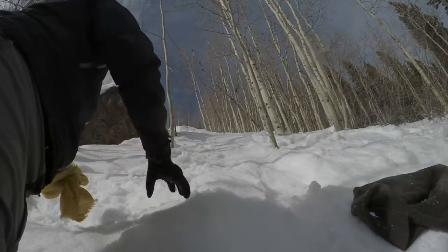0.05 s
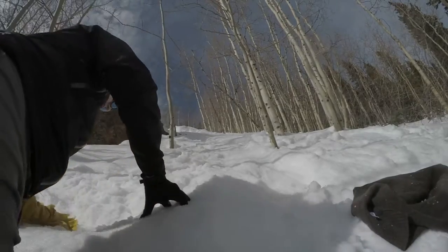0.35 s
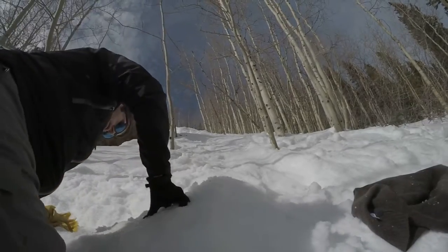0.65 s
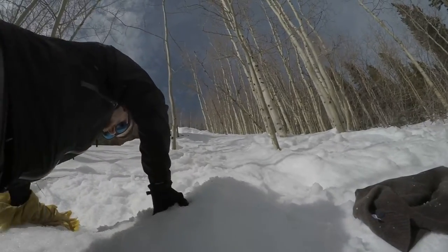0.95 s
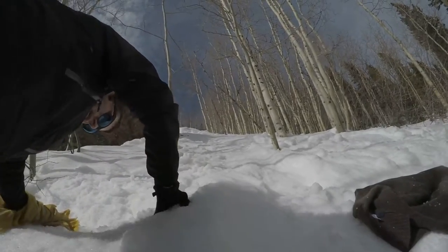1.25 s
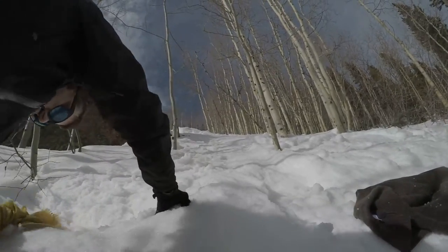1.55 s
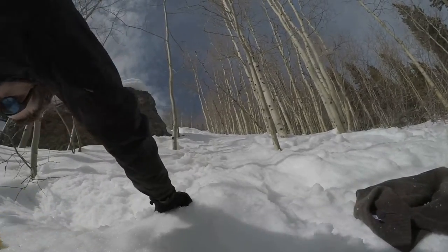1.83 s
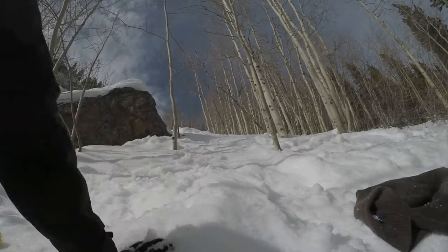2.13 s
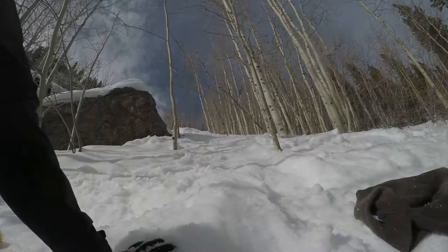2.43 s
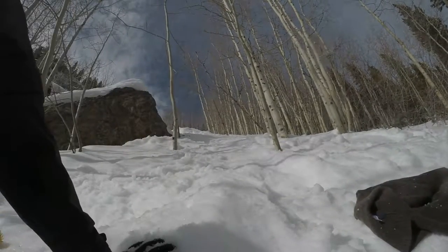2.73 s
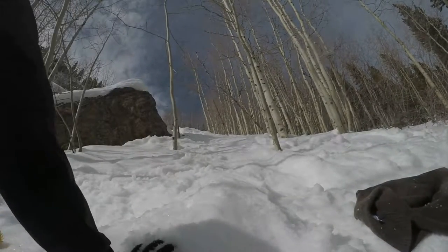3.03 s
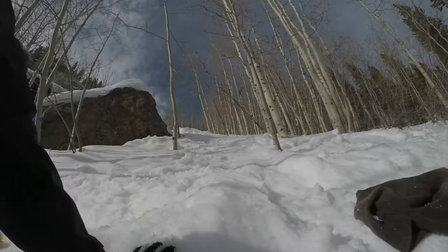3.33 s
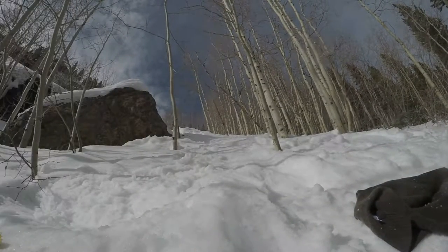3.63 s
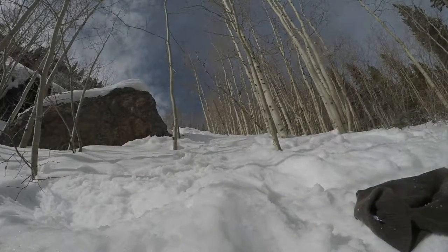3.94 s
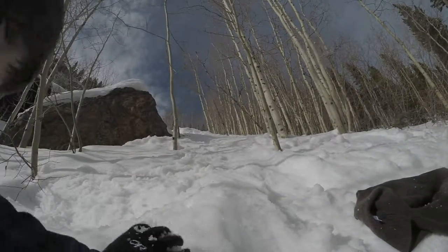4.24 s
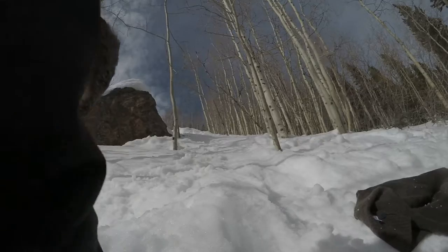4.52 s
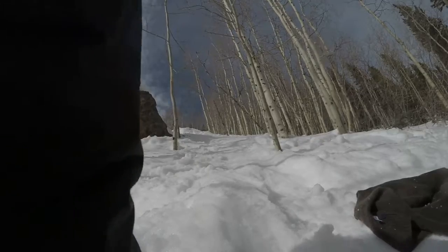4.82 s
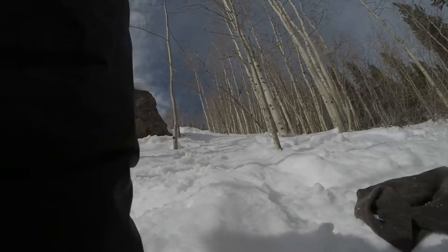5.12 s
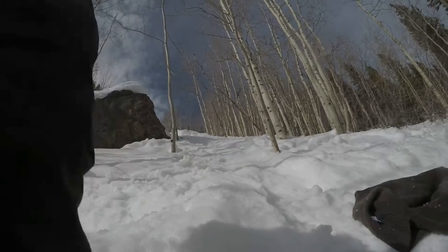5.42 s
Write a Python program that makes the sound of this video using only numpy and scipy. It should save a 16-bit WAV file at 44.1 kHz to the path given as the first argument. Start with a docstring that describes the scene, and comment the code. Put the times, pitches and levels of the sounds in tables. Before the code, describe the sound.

Outdoors in quiet air, a microphone resting in the snow picks up a person shifting about very close by. First come muffled crunches, low creaks and gritty glove scrapes as a hand presses into the crust. Soft nylon swishes and scattered ticks follow, with a few more knocks. Last and loudest, one heavy footstep thuds and crunches beside the microphone, sounding slightly boxy.

```python
"""Packed snow knocks, crunches and groans as someone leans on a gloved hand and shifts about.
Its slips ring the case of a camera set in the snow right beside them, and so reach its two microphones.
The crust snaps, the glove scuffs over it, and the sleeves of a nylon jacket swish and zip, over a faint
outdoor hush. At the end a heavy step crunches down next to the camera."""
import sys
import numpy as np
from scipy import signal
from scipy.fft import rfft, irfft
from scipy.io import wavfile
from scipy.ndimage import uniform_filter1d

SR = 44100
rng = np.random.default_rng(int(sys.argv[2]) if len(sys.argv) > 2 else 0)


def to_wav(sig):
    """Store sig (one row per channel, or 1-D mono) as 16-bit WAV at the path in sys.argv[1].

    Samples outside -1..1 are clipped; the rate is SR.
    """
    pcm = np.clip(np.atleast_2d(sig), -1, 1) * 32767
    pcm = np.round(pcm).astype(np.int16)
    wavfile.write(sys.argv[1], SR, pcm.T)  # frames by channels


N = 250047
TIME = np.arange(N) / SR
SIDES = np.array([[1], [-1]])   # left, right


# single slips, relative levels: (time [s], thud [dB], clack [dB], ring [dB], thud tilt [dB/octave])
SNOW_SLIPS = [(0.575, -25, -43, -49, 3), (0.739, -17, -44, -51, 18), (0.792, -19.5, -29, -27.5, 4),
              (0.808, -27, -31, -49, 10), (0.861, -17.5, -29, -35.5, 5), (1.061, -21, -40, -52, 3),
              (1.148, -26, -39, -61, -3), (1.492, -14, -27.5, -31.5, 0), (1.575, -24.5, -47, -56, -2),
              (1.681, -30, -47, -50, 11), (1.801, -24, -48, -59, -5), (2.091, -20, -34.5, -43, -5),
              (2.656, -23, -39.5, -49, 2), (3.198, -24.5, -41.5, -56, -4), (3.732, -25, -41, -57.5, 1),
              (4.174, -32, -60, -69.5, -1.5), (4.429, -26.5, -58, -53, 0), (4.642, -15.5, -30, -37.5, -0.5),
              (4.763, -19, -37, -42, 2.5), (5.229, -32, -42.5, -62, -1), (5.345, -26, -52, -48.5, -0.5),
              (5.493, -1.5, -42, -42, 5), (5.534, -9, -33, -31, 1), (5.545, -13.5, -34.5, -32, 5),
              (5.557, -15, -41, -41, 2), (5.622, -6.5, -26.5, -52, 11), (5.645, -22, -31, -55, 5)]

def knocks(thud_db=14, clack_db=16, ring_db=10, soft_hz=300, highpass_hz=148):
    """Snow gives way in single slips that push on the case; the harder ones reach its higher modes."""
    s, thud, clack, ring, tilt = np.transpose(SNOW_SLIPS)
    at = np.clip((s * SR).astype(int), 0, N - 1)

    def force_at(hz):
        if hz < 400:
            blow_db = thud + thud_db + tilt * np.log2(hz / 200)
        else:
            blow_db = clack + clack_db if hz < 900 else ring + ring_db
        push = np.zeros(N)
        push[at] = from_db(blow_db + rng.normal(0, 0.84, len(at)))
        return cut(push, soft_hz, "low") if hz < 400 else push   # the snow bed yields slowly
    return cut(case(force_at, damping=1.72, top_hz=1680), highpass_hz, "high", order=4)


# runs of quick slips: (start [s], relative level [dB], length [s], slip gap [s], lower-mode gain [dB])
SLIP_RUNS = [(0.5615, -30, 0.008, 0.003, 5.5), (0.585, -37, 0.006, 0.0038, 6),
             (0.73, -38.5, 0.02, 0.0032, 7), (0.814, -35, 0.008, 0.0031, 2), (0.83, -37, 0.017, 0.0086, 6),
             (4.807, -37, 0.007, 0.004, -9), (5.5083, -16, 0.003, 0.0025, -2),
             (5.515, -10.5, 0.0135, 0.0055, -2), (5.5294, -18, 0.008, 0.0053, 3),
             (5.546, -16, 0.008, 0.005, -4), (5.559, -17.5, 0.005, 0.0035, 0),
             (5.587, -14, 0.004, 0.0072, 3), (5.598, -18, 0.008, 0.007, 3.5),
             (5.612, -21.5, 0.019, 0.0042, 2), (5.638, -37, 0.011, 0.004, 3)]

def crunches(level_db=1, first_db=1, jitter=0.0996, scatter_db=2.5, highpass_hz=450):
    """Snow fails in a run of nearly even slips; each hits the case at another spot, changing colour."""
    max_slips = 12
    slips = []
    for s, db, length, gap_s, body_db in SLIP_RUNS:
        delays_s = np.cumsum(gap_s * np.exp(jitter * rng.standard_normal(max_slips)))
        slips.append((s, db + first_db, body_db))
        slips += [(s + delay, db, body_db) for delay in delays_s if delay < length]
    s, db, body_db = np.transpose(slips)
    at = np.minimum((s * SR).astype(int), N - 1)

    def force_at(hz):
        push = np.zeros(N)
        scatter = rng.standard_normal(max_slips * (len(SLIP_RUNS) + 1))[:len(at)]
        push[at] = from_db(db + body_db * (hz < 1200) + scatter_db * scatter)
        return cut(push, highpass_hz, "high")
    return from_db(level_db) * case(force_at, damping=1.6)


# weight packing the snow: (start [s], length [s], relative level [dB], slip rate [1/s])
SNOW_PRESSES = [(0.118, 0.034, -37, 221), (0.191, 0.034, -37.5, 228), (0.267, 0.027, -35, 260),
                (0.335, 0.16, -38, 244), (0.548, 0.05, -29.5, 247), (0.621, 0.029, -35, 249),
                (0.694, 0.022, -32.5, 253), (0.732, 0.012, -23.5, 264), (0.799, 0.055, -32, 234),
                (0.901, 0.29, -40.5, 229), (1.232, 0.0606, -29.5, 175.5), (1.341, 0.047, -37.5, 182),
                (1.517, 0.13, -32, 229), (1.669, 0.049, -28, 274), (1.741, 0.0559, -32, 250),
                (1.803, 0.0922, -42.5, 185), (1.936, 0.013, -38.5, 177), (2.813, 0.026, -36, 159),
                (2.85, 0.129, -42.5, 160), (4.434, 0.1, -44, 200), (4.589, 0.062, -39.5, 181),
                (4.836, 0.13, -42.5, 235), (5.21, 0.099, -37.5, 182), (5.336, 0.023, -30, 200),
                (5.387, 0.077, -45, 244), (5.48, 0.016, -27, 180), (5.514, 0.03, -20, 257),
                (5.575, 0.028, -26.5, 190), (5.612, 0.023, -18.5, 250)]

def groan(level_db=1, rest_db=-54, rest_per_s=205, muffle_hz=320, lumps_db=1.5, rumble_db=-21):
    """Loaded snow creaks in nearly periodic slips, muffled to the low modes; it settles between presses."""
    loads = [(from_db(db) * held(s, length, attack_s=0.01506, release_s=0.03), per_s)
             for s, length, db, per_s in SNOW_PRESSES]
    weight = power_sum((load for load, _ in loads), rest_db)
    per_s = blended_rate(loads, weight, rest_per_s)
    slips = stick_slip(per_s * np.exp(0.14 * drift(24.78)))
    slips = cut(slips, muffle_hz, "low", order=5)
    slips = cut(slips, 121, "high")
    creak = evened(case(lambda hz: slips, damping=0.91), window_s=0.0248)
    # the camera rocks in its bed, more under heavy load
    rumble = unit_rms(cut(rng.standard_normal(N), [20, 70], "band"))
    rumble = rumble * from_db(rumble_db) * (weight / weight.mean()) ** 0.66
    return weight * from_db(level_db + lumps_db * drift(25)) * (creak + rumble)


def stick_slip(per_s, jitter=0.2, spread=0.38):
    """Stress builds and lets go at uneven intervals: clicks of one sign and varying size."""
    gaps, sizes = rng.standard_normal((2, 8000))
    at = np.searchsorted(np.cumsum(per_s) / SR, np.cumsum(np.exp(jitter * gaps)))
    slips = np.zeros(N)
    slips[at[at < N]] = np.exp(spread * sizes[at < N])
    return slips


# modes of the case in snow: (frequency [Hz], t60 at damping 1 [s], gain [dB], L-R phase [rad], L-R [dB])
CASE_MODES = [(155.5, 0.039, -3.5, 0.44, -6), (194.4, 0.084, -14, 0.12, -0.5), (241, 0.042, -9, 1.24, 1.5),
              (300, 0.017, -15, 3.05, 10), (520, 0.11, -13.5, 1.1, 10), (575.5, 0.041, -2.5, 3.61, 8.5),
              (710, 0.051, -8.5, 2.84, 0.5), (815, 0.021, -17.5, 2.47, -4), (954.7, 0.1, -15.5, 2, -6),
              (1310, 0.05, -18, 1.5, -7), (1448, 0.056, -10.5, 7.4, -1), (1616, 0.061, -3.5, 2.6, 1),
              (1745, 0.038, -8, 0.66, -7), (1836, 0.071, -19, 1.1, -7), (1984, 0.1, -18.5, 0.36, 7),
              (2092, 0.078, -21.5, 0.91, -9)]

def case(force_at, damping, top_hz=2400, band_ratio=1.25, give=0.026, give_hz=5):
    """The case rings, each mode driven by force_at(hz); the snow bed gives, detuning the lower modes."""
    bend = 2 * np.pi * np.cumsum(give * drift(give_hz)) / SR
    out = 0
    for hz, t60, db, phase, pan_db in CASE_MODES:
        pole = from_db(-60 * damping / (t60 * SR)) * np.exp(2j * np.pi * hz / SR)
        force = cut(force_at(hz), [hz / band_ratio, hz * band_ratio], "band", order=1)
        detune = np.exp(1j * hz * bend) if hz < 800 else 1
        swing = detune * signal.lfilter([1], [1, -pole], force / detune + 1e-18)
        out = out + np.imag(swing * np.exp(0.5j * SIDES * phase)) * from_db(db + SIDES * pan_db / 2)
    return cut(out, top_hz, "low", order=4)


# crystal spray: (frequency [Hz], relative density [dB])
SPRAY_SPECTRUM = [(200, 6), (600, 17.5), (2000, 12), (4000, 4.5), (6500, 2.5), (9000, -9), (15000, -48)]
# crust breaks: (time [s], relative level [dB], t60 [s], flake pitch [Hz], edge gain [dB])
CRUST_SNAPS = [(0.0204, -31.5, 0.0069, 2700, 23.5), (0.0515, -41.5, 0.0094, 1400, 18),
               (0.47, -40.5, 0.015, 1300, 20), (0.959, -35.5, 0.067, 1600, 11),
               (1.043, -40, 0.027, 1900, 19), (1.193, -41, 0.044, 1900, 15), (1.307, -41, 0.035, 1950, 9),
               (1.479, -35, 0.022, 2000, 18), (1.563, -35.5, 0.034, 2300, 14),
               (1.6778, -23, 0.018, 3900, 11.5), (1.694, -31.5, 0.03, 4200, 13),
               (1.706, -31, 0.025, 2000, 10), (1.766, -27.5, 0.022, 3820, 17),
               (1.781, -36, 0.02, 3694, 17.5), (2.358, -40, 0.021, 4500, 18),
               (2.555, -42.5, 0.027, 1198, 19.5), (2.733, -43, 0.02, 2010, 19), (2.9, -36, 0.041, 1194, 17),
               (2.926, -34, 0.051, 1246, 18), (2.98, -37, 0.034, 2970, 13), (3.148, -43, 0.042, 4200, 12.5),
               (4.2257, -35, 0.02, 1100, 16.5), (4.868, -35, 0.051, 4808, 15.5),
               (4.881, -44, 0.026, 3000, 17), (5.183, -38, 0.026, 1300, 14), (5.499, -21, 0.069, 3645, 17),
               (5.51, -20, 0.032, 3400, 7)]

def snaps(level_db=-1, flake_db=3, band_ratio=1.24, edge_top_hz=4800):
    """Crust breaks with a sharp edge and a spray of crystals; each flake rings at the pitch of its size."""
    crystals = evened(friction(SPRAY_SPECTRUM, per_s=16000, spread_db=0.5), window_s=0.0035)
    impulse = 1.0 * (TIME == 0)
    edge = cut(cut(impulse, 510, "high"), edge_top_hz, "low", order=8)
    out = np.zeros((2, N))
    for s, db, t60, hz, edge_db in CRUST_SNAPS:
        start = int(s * SR)
        age = TIME[:min(SR // 4, N - start)]
        span = slice(start, start + len(age))
        burst = crystals[:, span] * from_db(-60 * age / t60) + from_db(edge_db) * edge[:len(age)]
        flake = cut(burst, [hz / band_ratio, hz * band_ratio], "band", order=1)
        out[:, span] += from_db(db) * (burst + from_db(flake_db) * flake)
    return from_db(level_db) * out


# glove on ice grains: (frequency [Hz], relative density [dB])
SCUFF_SPECTRUM = [(150, -6), (260, -0.5), (430, 1), (600, -1), (800, -0.5), (1600, -4), (1980, -8),
                  (2250, -8.5), (2800, -14), (3400, -13), (4100, -12.5), (5300, -25), (6200, -35),
                  (9000, -67)]
# drags over the crust, relative levels: (start [s], length [s], scuff [dB], rasp [dB], rasp pitch [Hz])
GLOVE_DRAGS = [(0.092, 0.28, -52, -63, 1870), (0.546, 0.21, -41.5, -57, 1942),
               (0.869, 0.52, -37.5, -50.5, 1879), (0.954, 0.035, -39.5, -43.5, 1400),
               (1.168, 0.065, -35, -46, 2004), (1.235, 0.07, -42, -42, 1954),
               (1.401, 0.22, -38.5, -50, 1838), (1.649, 0.047, -34, -45.5, 1850),
               (1.721, 0.082, -41.5, -61, 1859), (2.001, 0.16, -55, -50, 1855),
               (2.212, 0.22, -55, -57.5, 1890), (2.456, 0.18, -44.5, -56, 1801),
               (2.802, 0.029, -36, -43, 1748), (2.84, 0.068, -38.5, -47.5, 1848),
               (2.902, 0.035, -39, -44.5, 1814), (2.942, 0.067, -42.5, -44, 1870),
               (3.006, 0.37, -47, -59, 1870), (3.467, 0.11, -44.5, -65, 1894),
               (3.756, 0.263, -54.5, -61.5, 1900), (4.227, 0.049, -50, -56, 1800),
               (4.501, 0.062, -39.5, -62.5, 1896), (4.861, 0.026, -32.5, -58, 1900),
               (4.92, 0.14, -39.5, -50.5, 1042), (5.047, 0.098, -47, -67, 1050),
               (5.341, 0.051, -55, -68, 1900), (5.476, 0.094, -33.5, -54.5, 1900),
               (5.58, 0.057, -52, -50, 1900)]

def glove(scuff_db=-2, grit_db=-2, scuff_rest_db=-49.5, rasp_rest_db=-66, rasp_hz=1900, flutter_db=1):
    """The glove grinds over ice grains; where it bites the crust it rasps and breaks off coarser grit."""
    scuffs, bites = [], []
    for s, length, db, bite_db, hz in GLOVE_DRAGS:
        drag = held(s, length, attack_s=0.00776, release_s=0.035)
        scuffs.append(from_db(db) * drag)
        bites.append((from_db(bite_db) * drag, hz))
    pressure = power_sum(scuffs, scuff_rest_db)
    bite = power_sum((envelope for envelope, _ in bites), rasp_rest_db)
    pitch_hz = blended_rate(bites, bite, rasp_hz)
    grind = from_db(scuff_db) * friction(SCUFF_SPECTRUM, per_s=3000, spread_db=0.5)
    rasp = pitched_rub(pitch_hz * np.exp(0.025 * drift(30.3)), width_hz=100)
    coarse = friction(SCUFF_SPECTRUM, per_s=230, spread_db=1.5)
    grit = from_db(grit_db) * evened(cut(coarse, [700, 2100], "band", order=3), window_s=0.033)
    return from_db(flutter_db * drift(54)) * (pressure * grind + bite * (rasp + grit))


# nylon on nylon: (frequency [Hz], relative density [dB])
NYLON_SPECTRUM = [(700, -7), (1450, -7), (1850, 0.5), (2200, -2), (2700, -1), (3600, 0.5), (4500, -0.5),
                  (5200, -1.5), (6500, -3), (8200, -15.5), (10000, -18.5), (11400, -28), (12600, -20),
                  (15000, -35)]
# sleeve and trouser strokes:
# (start [s], rise [s], hold [s], fall [s], relative level [dB], treble [dB], L-R [dB], base pitch [Hz])
NYLON_STROKES = [(0.083, 0.037, 0.0084, 0.039, -53, -9, -1.5, 4290),
                 (0.2, 0.02, 0.032, 0.043, -46.5, 0, -2.5, 4590),
                 (0.589, 0.027, 0.099, 0.046, -48, -8, -14, 4330),
                 (0.92, 0.041, 0.076, 0.032, -41, -16, 0, 5200),
                 (1.056, 0.13, 0.03, 0.048, -42, -16, 0, 5200),
                 (1.215, 0.039, 0.087, 0.04, -45.5, -12, 0, 5200),
                 (1.356, 0.064, 0.041, 0.16, -41, -2.5, 1, 3706),
                 (1.552, 0.14, 0.038, 0.05, -41.5, -11, 3, 3730),
                 (1.721, 0.041, 0.087, 0.14, -48.5, 4, 0.5, 3716),
                 (1.91, 0.17, 0.16, 0.039, -41, 4.5, 0.5, 4410),
                 (2.12, 0.0758, 0.066, 0.024, -47.5, 13, -3.5, 5300),
                 (2.278, 0.02, 0.023, 0.028, -42.5, 2, -1, 4615),
                 (2.339, 0.044, 0.1, 0.23, -51.5, 5, 1, 4300),
                 (2.792, 0.013, 0.032, 0.038, -42.5, -4, 6, 3724),
                 (2.88, 0.039, 0.08, 0.031, -49.5, 3, 0.5, 5420),
                 (2.99, 0.032, 0.19, 0.058, -42.5, 2.5, -1.5, 4397),
                 (3.318, 0.08, 0.061, 0.042, -51, 1, 2, 4600),
                 (3.45, 0.077, 0.12, 0.096, -46, 6.5, -1.5, 4518),
                 (3.512, 0.014, 0.024, 0.047, -44, 6.5, -2, 4223),
                 (3.699, 0.076, 0.021, 0.052, -47, 7, -1, 4400),
                 (3.818, 0.045, 0.0365, 0.06, -47, -1, -1, 4217),
                 (4.216, 0.053, 0.01, 0.044, -47.5, -3, 5, 4410),
                 (4.397, 0.028, 0.031, 0.032, -51, 5, -2, 4890),
                 (4.459, 0.062, 0.067, 0.059, -43, 3.5, -1, 4878),
                 (4.58, 0.038, 0.054, 0.017, -45, 4, -1.5, 3910),
                 (4.855, 0.0081, 0.042, 0.028, -46, 7.5, 6, 4001),
                 (4.918, 0.038, 0.035, 0.094, -50, 8, 2.5, 3990),
                 (5.068, 0.053, 0.03, 0.067, -54, 10, 0.5, 4020),
                 (5.357, 0.14, 0.0095, 0.033, -38, 5.5, -2, 4400),
                 (5.472, 0.03, 0.0053, 0.087, -33, -1.5, 1, 4304),
                 (5.542, 0.043, 0.0053, 0.18, -46, -0.5, 1.5, 4300)]

def swishes(level_db=-1.42, rest_db=-53, zip_db=-8, weave_hz=4167, flutter_db=1, shimmer_db=1):
    """Sliding nylon hisses with its speed; taut cloth is brighter; the weave zips at each stroke's pitch."""
    strokes, sheens, pitches = [], [], []
    for s, rise, hold, fall, db, treble_db, pan_db, hz in NYLON_STROKES:
        ramp = np.interp(TIME, s + np.cumsum([0, rise, hold, fall]), [0, 1, 1, 0])
        speed = np.sin(np.pi / 2 * ramp)
        stroke = from_db(db + SIDES * pan_db / 2) * speed ** 0.92
        strokes.append(stroke)
        sheens.append(stroke * from_db(treble_db))
        pitches.append((stroke[0], hz))
    body = power_sum(strokes, rest_db)
    sheen = power_sum(sheens, rest_db) * from_db(shimmer_db * drift(37))
    hiss = friction(NYLON_SPECTRUM, per_s=22000, spread_db=2)
    dull = cut(hiss, 6000, "low", order=1)
    surge = body[0] / uniform_filter1d(body[0], SR // 5)
    pitch_hz = blended_rate(pitches, body[0], weave_hz) * surge ** 0.05
    weave = from_db(zip_db) * pitched_rub(pitch_hz, width_hz=330)
    return from_db(level_db + flutter_db * drift(19)) * (body * (dull + weave) + sheen * (hiss - dull))


# skids of taut folds: (start [s], length [s], level [dB], pitch [Hz])
FOLD_SKIDS = [(0.108, 0.006, -50, 4810), (0.122, 0.005, -53, 4800), (0.216, 0.024, -48, 4630),
              (0.618, 0.0074, -40.5, 4700), (1.405, 0.046, -46.5, 4660), (2.056, 0.1, -44, 4900),
              (2.198, 0.049, -44, 5030), (3.775, 0.025, -49, 4900)]

def zips():
    """A taut fold catches and skids over the ribs of the weave."""
    skids = [(from_db(db) * held(s, length, attack_s=0.0054, release_s=0.012), hz)
             for s, length, db, hz in FOLD_SKIDS]
    level = sum(skid for skid, _ in skids)
    pitch_hz = sum(skid * hz for skid, hz in skids) / (level + 1e-12)
    return level * pitched_rub(pitch_hz, width_hz=520)


# stiff cloth crackle: (frequency [Hz], relative density [dB])
FLICK_SPECTRUM = [(300, 5.5), (1200, 2.5), (3800, -4.5), (5000, -8.5), (6100, -1), (7600, -9),
                  (9000, -16.5), (15000, -20)]

def flick(level_db=-31.5):
    """A stiff fold flicks straight with one short, bright crackle."""
    envelope = held(start_s=4.856, length_s=0.013, attack_s=0.0017, release_s=0.014)
    crackle = evened(friction(FLICK_SPECTRUM, per_s=2500, spread_db=2), window_s=0.0045)
    return from_db(level_db) * envelope * crackle


# outdoor air: (frequency [Hz], relative density [dB])
HUSH_SPECTRUM = [(25, -36), (100, -17), (160, 3), (300, -1), (430, -4), (580, -3.5), (900, -8), (1800, -12),
                 (2500, -28), (4200, -25), (7000, -17), (10000, -20.5), (11500, -27), (15000, -36)]

def hush(level_db=-48.5):
    """Faint, steady outdoor noise."""
    return from_db(level_db) * airborne(HUSH_SPECTRUM, rng.standard_normal((2, N)))


# airborne sound at the two microphone ports: (frequency [Hz], L-R correlation before clipping [-])
PORT_CORRELATION = [(50, 7), (110, -1.5), (180, 0), (400, 0.42), (800, -0.5), (1800, 0.17), (3500, 0.52),
                    (5000, 0.3), (6500, -0.43), (10000, 0.03), (14000, 0.16)]
# balance between the ports: (frequency [Hz], L-R [dB])
PORT_BALANCE = [(60, 3), (170, 8), (400, 0), (800, 2), (1800, 3), (3200, 4.5), (4600, 0.5), (6500, 3.5),
                (9000, -2), (14000, 0.5)]

def airborne(spectrum, pair):
    """Two unrelated excitations, coloured and spread over the two ports; rms 1."""
    hz = np.fft.rfftfreq(N, 1 / SR)
    mid, side = rfft(pair) * from_db(at_hz(spectrum, hz))
    alike = np.clip(at_hz(PORT_CORRELATION, hz), -0.98, 0.98)
    ports = np.sqrt(1 + alike) * mid + SIDES * np.sqrt(1 - alike) * side
    balance = from_db(SIDES * at_hz(PORT_BALANCE, hz) / 2)
    return unit_rms(irfft(ports * balance, N))


def friction(spectrum, per_s, spread_db):
    """Tiny catches between fibres or ice grains: random clicks of uneven size and either sign."""
    pair = []
    for _ in range(2):
        sizes = from_db(spread_db * np.minimum(rng.exponential(1, N), 4)) * rng.choice([-1, 1], N)
        pair.append(unit_rms(sizes * (rng.random(N) < per_s / SR)))
    return airborne(spectrum, np.array(pair))


def pitched_rub(pitch_hz, width_hz, side_gain=0.57):
    """Rubbing as a noise band around a moving pitch, partly alike at the two ports; rms 1."""
    noise = rng.standard_normal((2, N)) + 1j * rng.standard_normal((2, N))
    mid, side = cut(noise, width_hz, "low")
    carrier = np.exp(2j * np.pi * np.cumsum(pitch_hz) / SR)
    return unit_rms(np.real((mid + side_gain * side * SIDES) * carrier))


def held(start_s, length_s, attack_s, release_s):
    """Push envelope: attack, hold until length_s, release."""
    age = TIME - start_s
    return np.clip(age / attack_s, 0, 1) * np.clip(1 - (age - length_s) / release_s, 0, 1)


def power_sum(envelopes, rest_db):
    """Unrelated strokes add in power over a resting level."""
    return np.sqrt(sum(e ** 2 for e in envelopes) + from_db(rest_db) ** 2)


def blended_rate(strokes, total, rest_hz):
    """Power-weighted rate of (envelope, rate) pairs: the strongest dominates."""
    return rest_hz + sum((hz - rest_hz) * (envelope / total) ** 2 for envelope, hz in strokes)


def drift(rate_hz):
    """Slow random wander, rms 1."""
    slow = cut(rng.standard_normal(N // 20 + 2002), 20 * rate_hz, "low")[2000:]
    return np.interp(np.arange(N) / 20, np.arange(len(slow)), unit_rms(slow))


def evened(x, window_s):
    """Divide out swells slower than the window."""
    power = uniform_filter1d(np.mean(x ** 2, axis=0), int(window_s * SR))
    return x / np.sqrt(np.maximum(power, 0) + power.mean() / 20)


def cut(x, hz, kind, order=2):
    """Butterworth low-, high- or band-pass."""
    return signal.sosfilt(signal.butter(order, hz, kind, fs=SR, output="sos"), x + 1e-18)


def at_hz(points, hz):
    """Interpolate a table over log frequency."""
    knots_hz, values = np.transpose(points)
    return np.interp(np.log(hz + 1e-9), np.log(knots_hz), values)


def from_db(db):
    """Decibels to gain."""
    return 10 ** (np.asarray(db) / 20)


def unit_rms(x):
    """Scale to rms 1."""
    return x / np.sqrt(np.mean(x ** 2) + 1e-20)


def scene():
    """Snow slips through the case; crust, cloth and hush through the air."""
    air = hush()
    return knocks() + crunches() + groan() + snaps() + glove() + swishes() + zips() + flick() + air


def record(dry, bass_hz=138, top_hz=15050, leak_db=-19):
    """Steep bass and top cuts; a trace of rumble leaks through."""
    hz = np.fft.rfftfreq(2 * N, 1 / SR)
    bass_cut = 1 / np.sqrt(1 + (bass_hz / (hz + 1)) ** 40)
    top_cut = 1 / np.sqrt(1 + (hz / top_hz) ** 300)
    return irfft(rfft(dry, 2 * N) * np.maximum(bass_cut, from_db(leak_db)) * top_cut)[:, :N]


dry = scene()
out = record(dry)
to_wav(out)
```